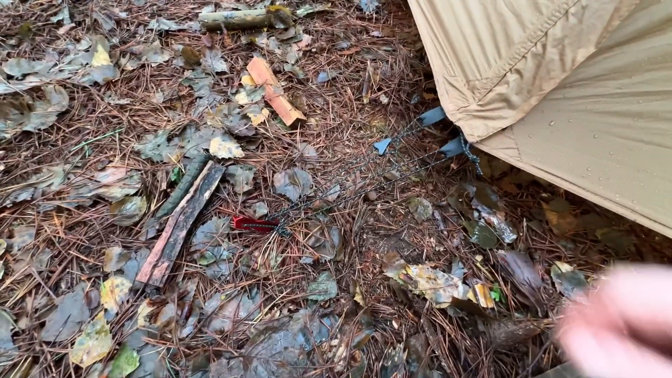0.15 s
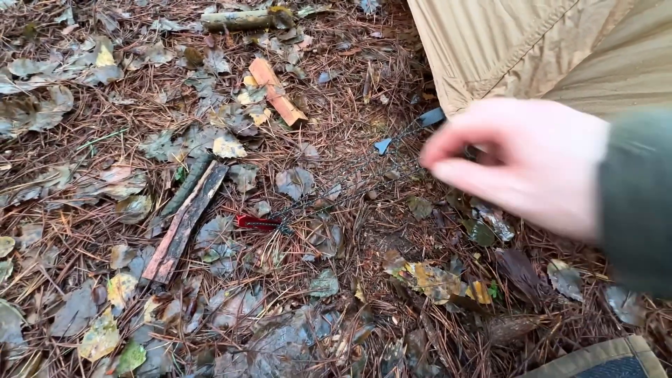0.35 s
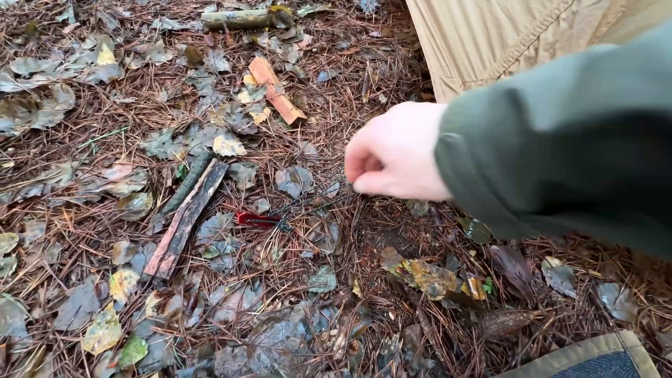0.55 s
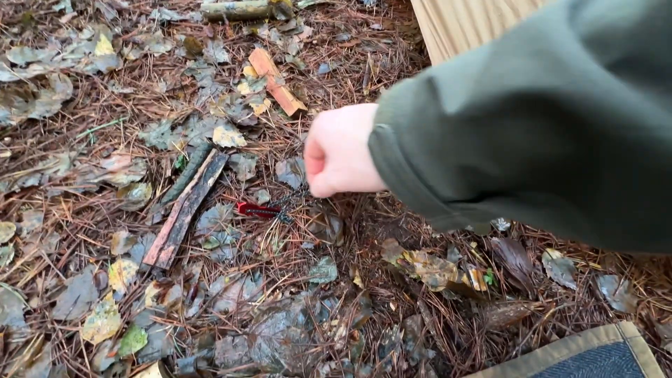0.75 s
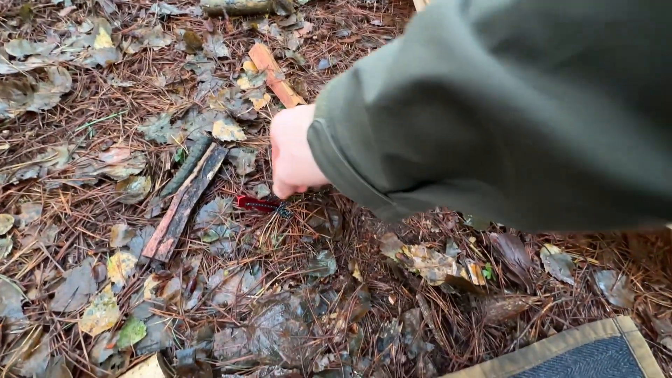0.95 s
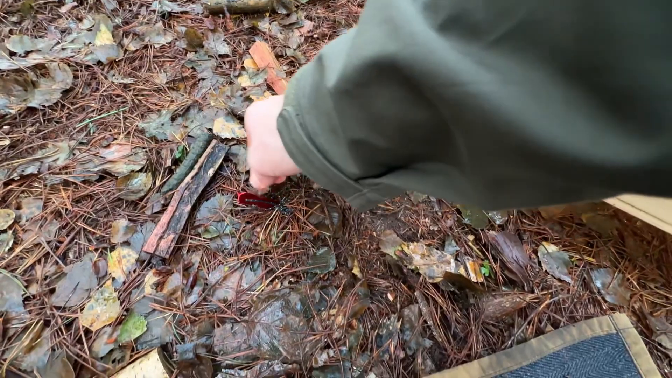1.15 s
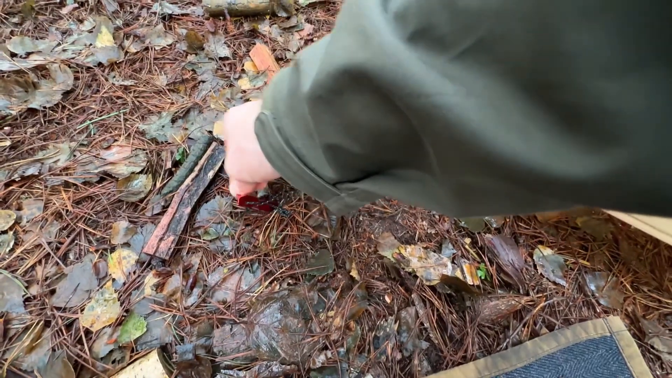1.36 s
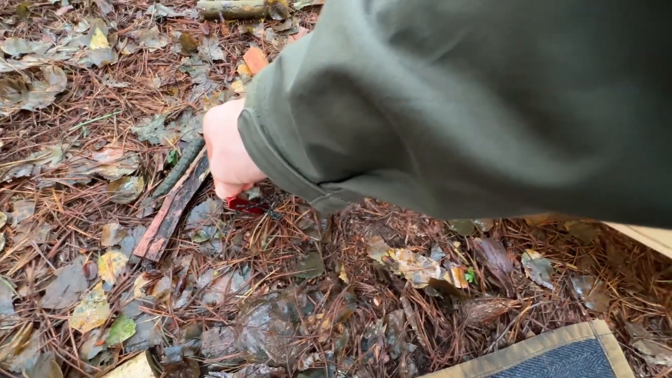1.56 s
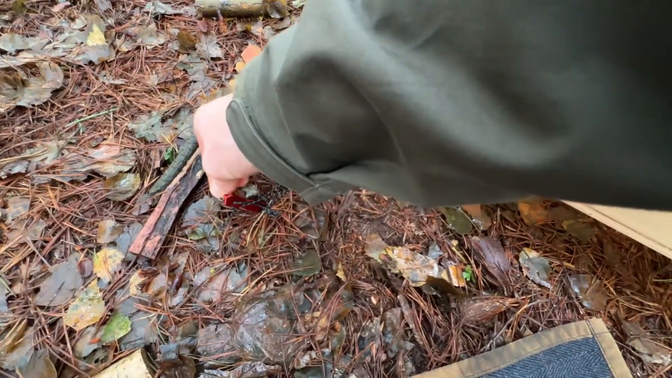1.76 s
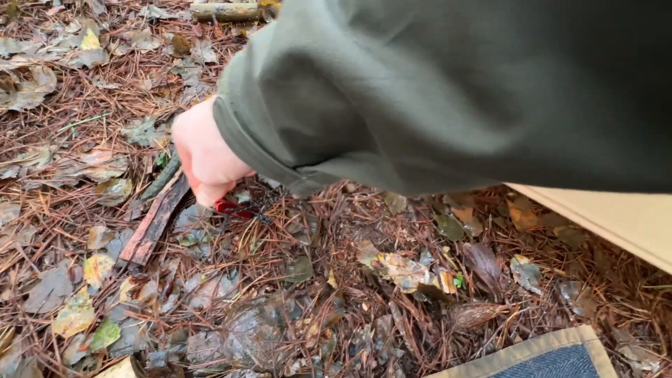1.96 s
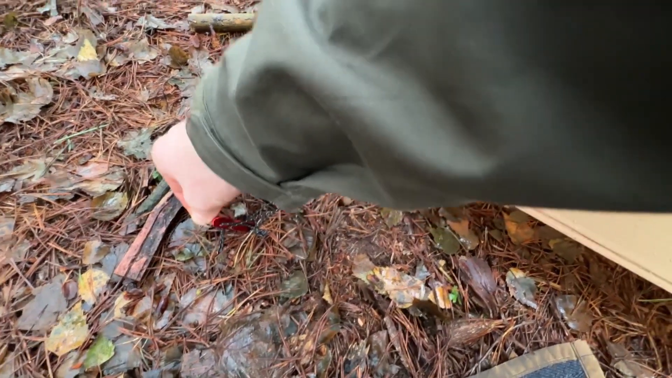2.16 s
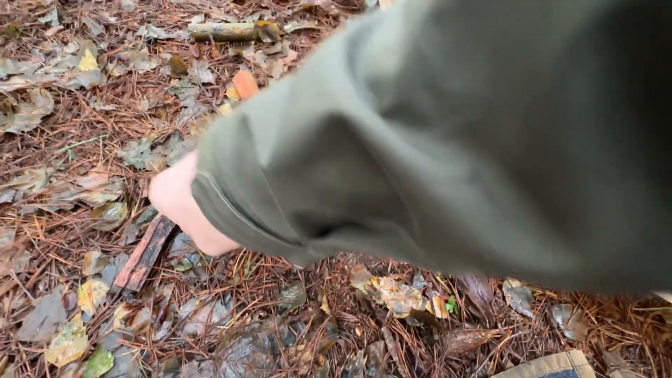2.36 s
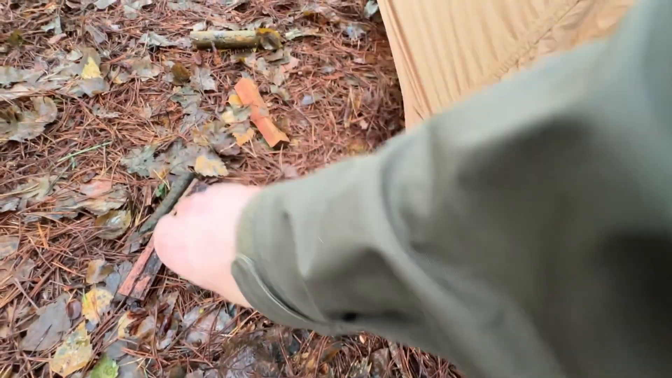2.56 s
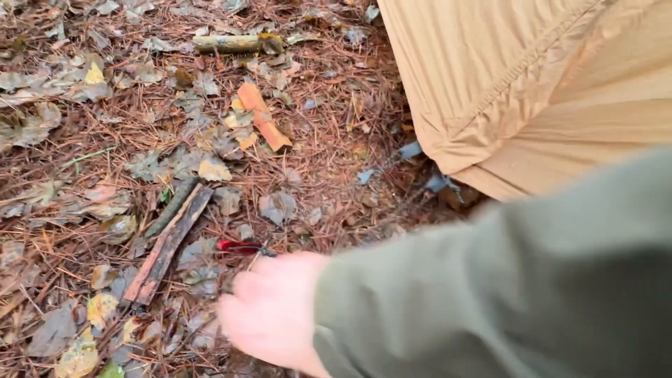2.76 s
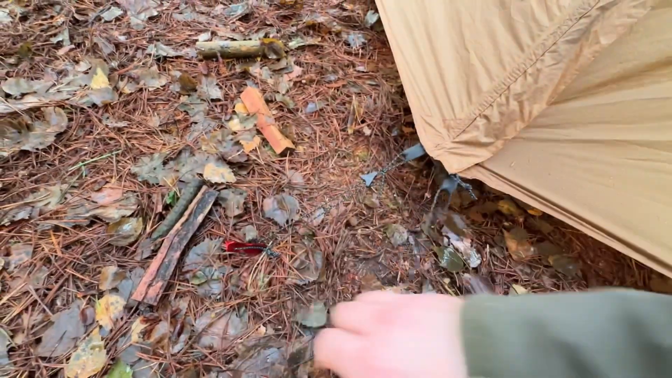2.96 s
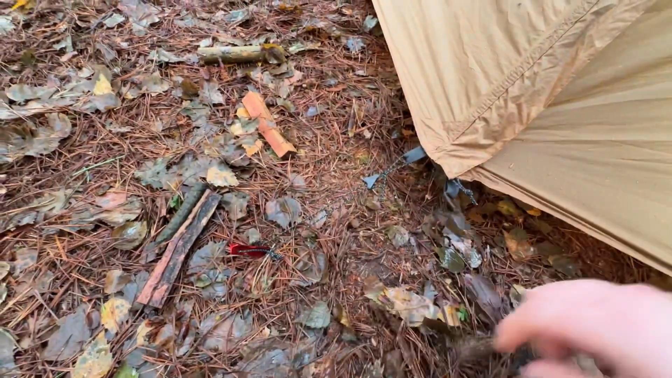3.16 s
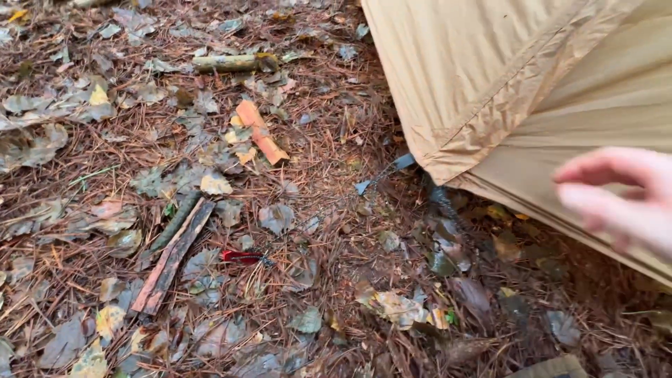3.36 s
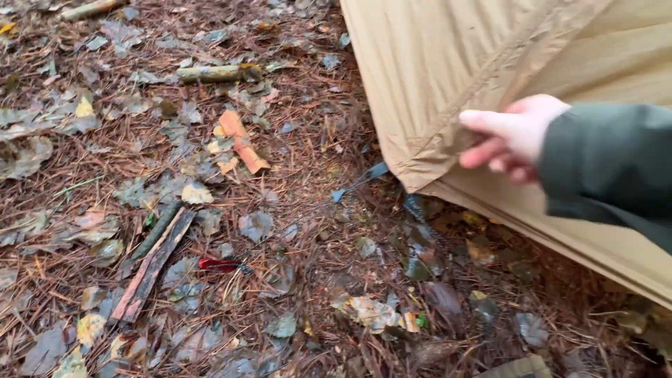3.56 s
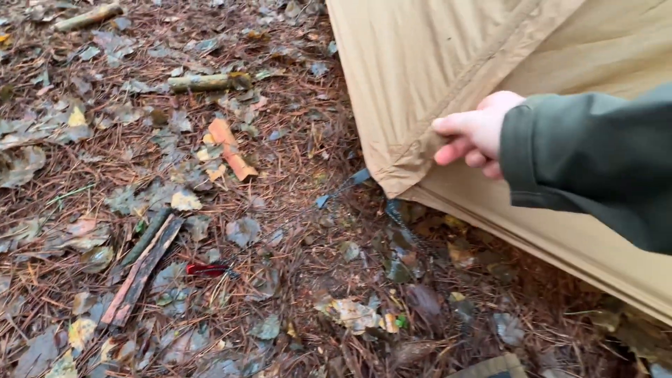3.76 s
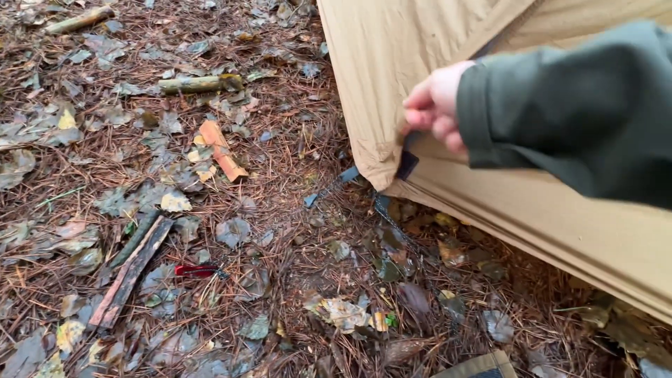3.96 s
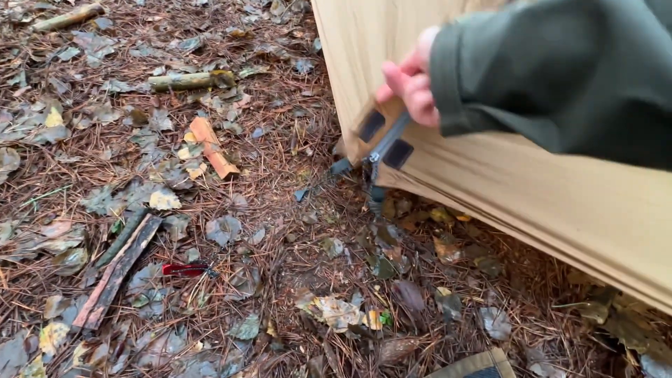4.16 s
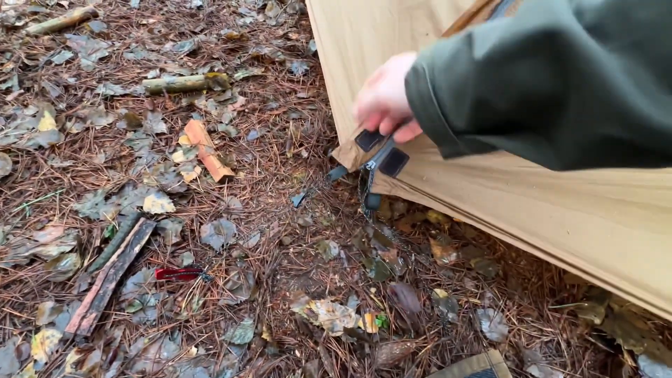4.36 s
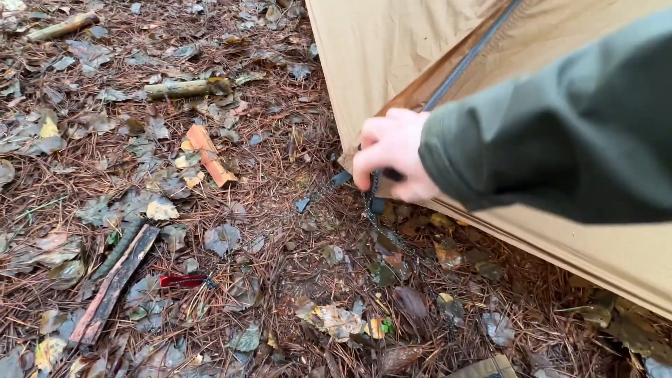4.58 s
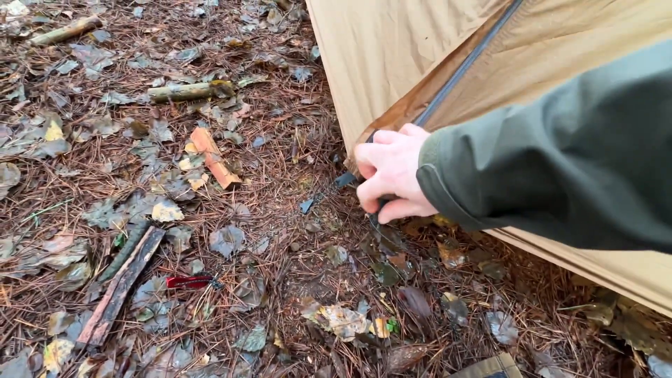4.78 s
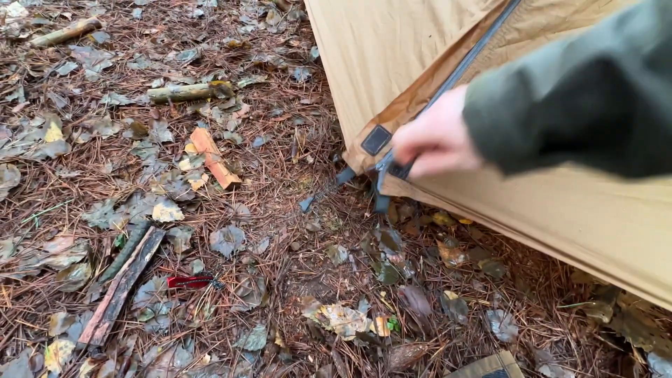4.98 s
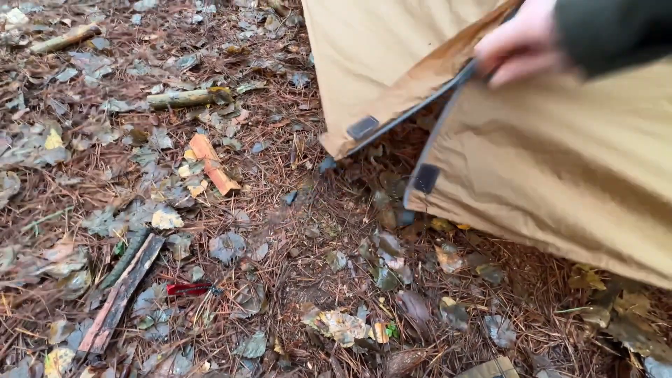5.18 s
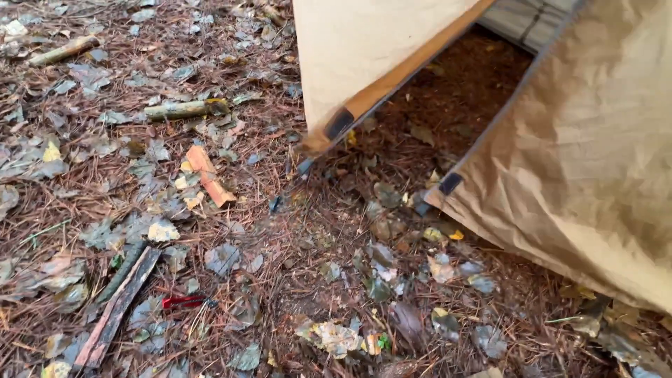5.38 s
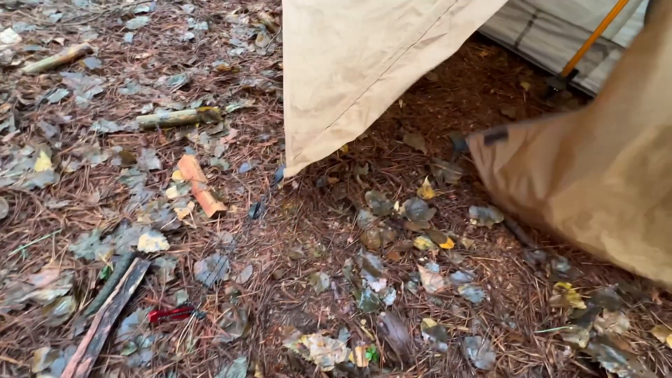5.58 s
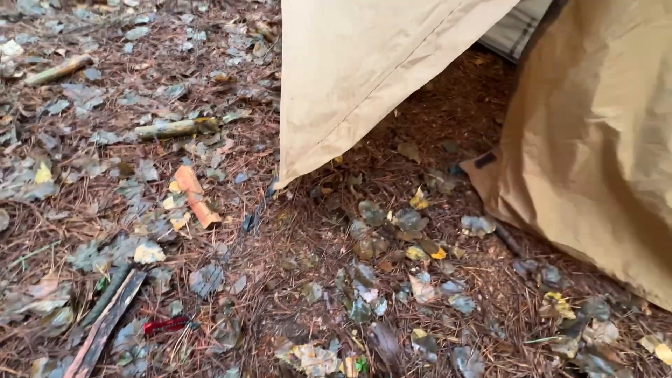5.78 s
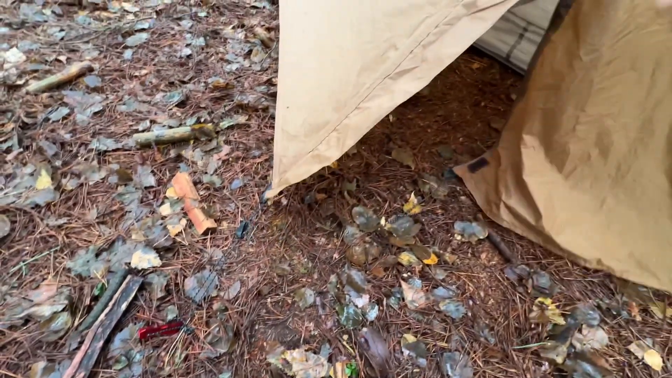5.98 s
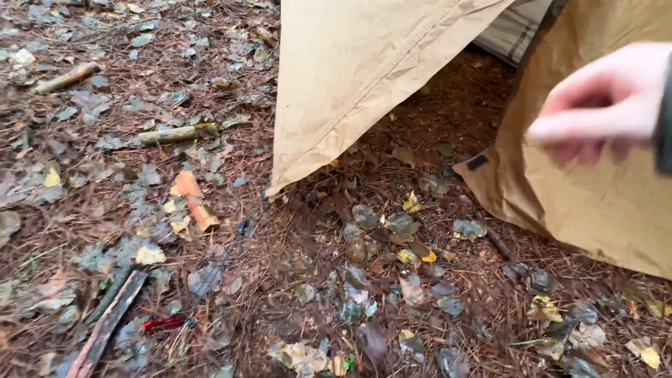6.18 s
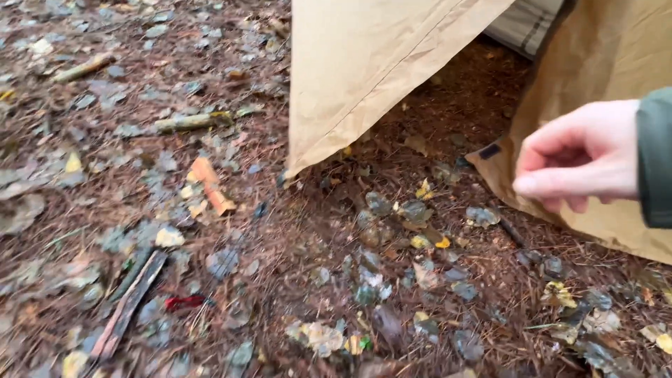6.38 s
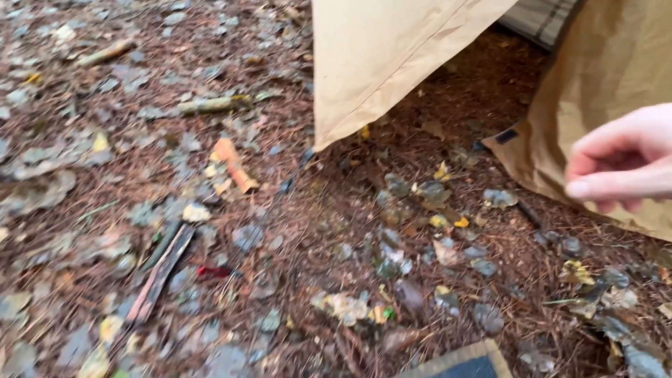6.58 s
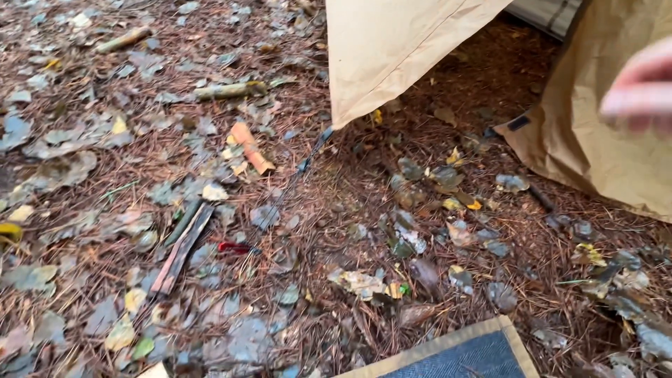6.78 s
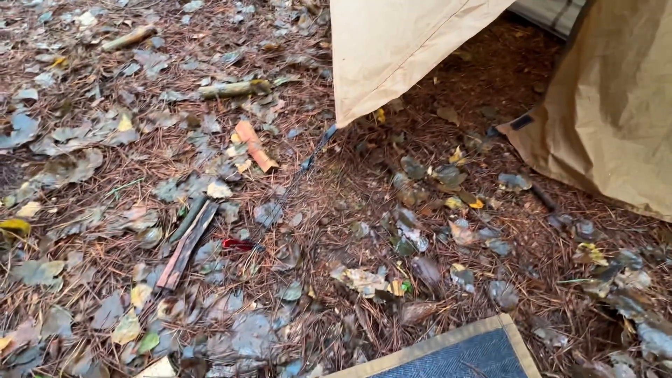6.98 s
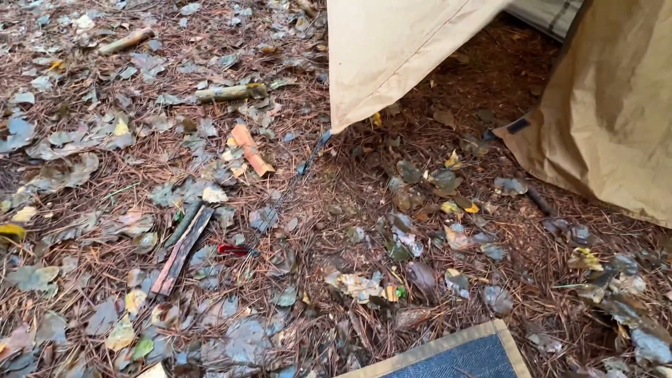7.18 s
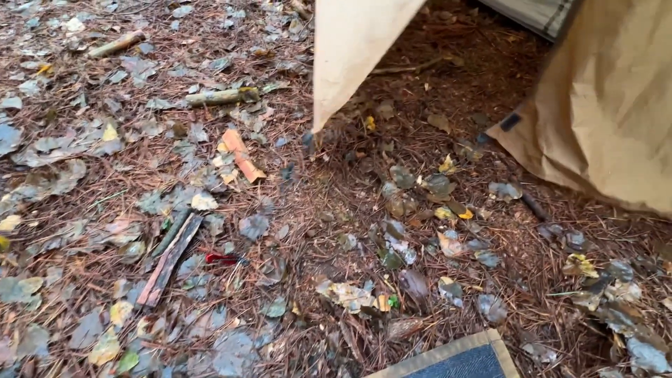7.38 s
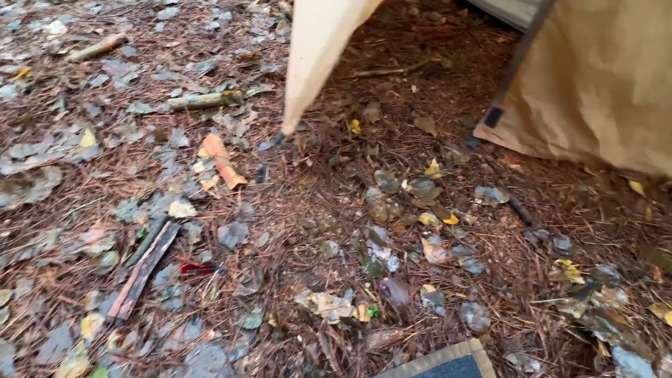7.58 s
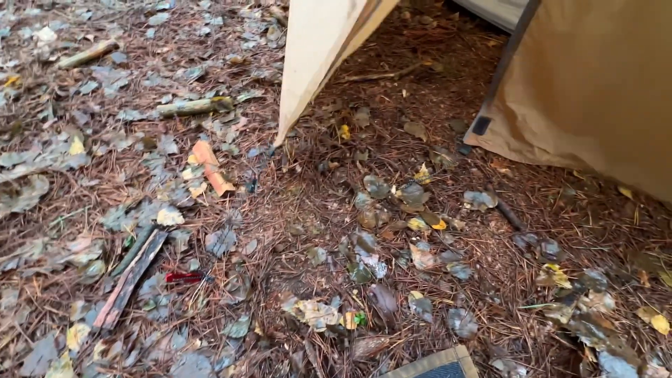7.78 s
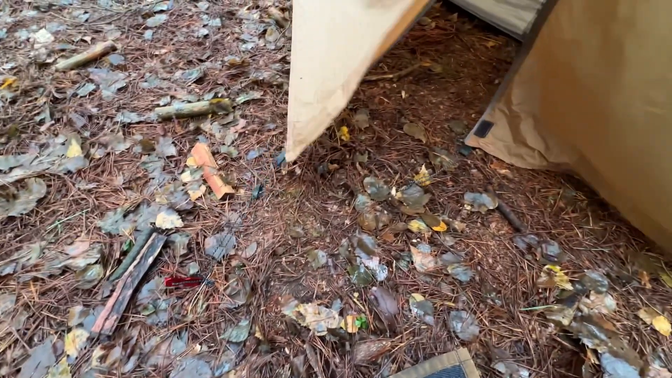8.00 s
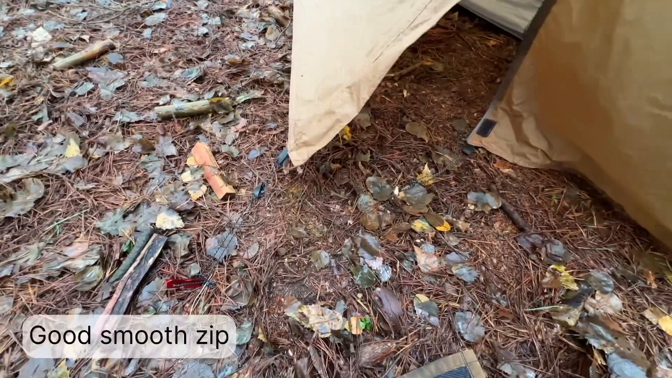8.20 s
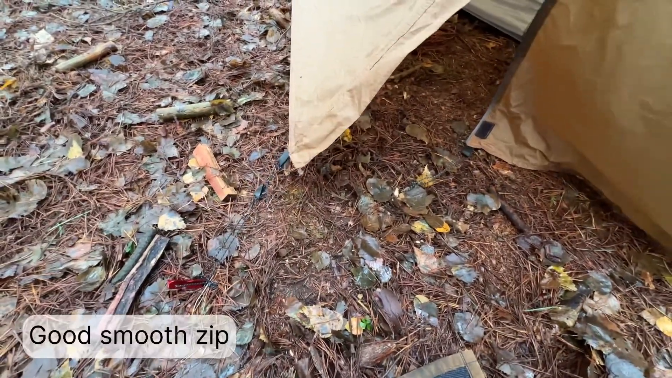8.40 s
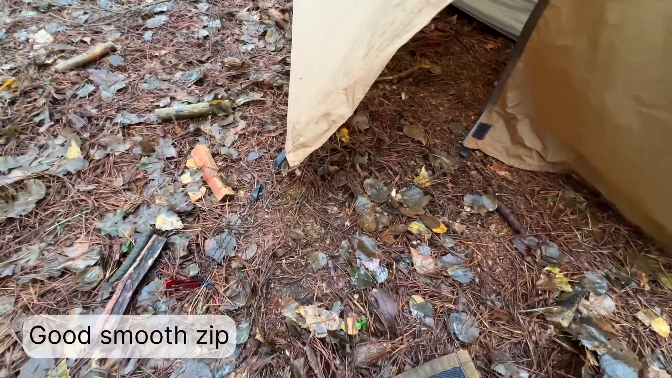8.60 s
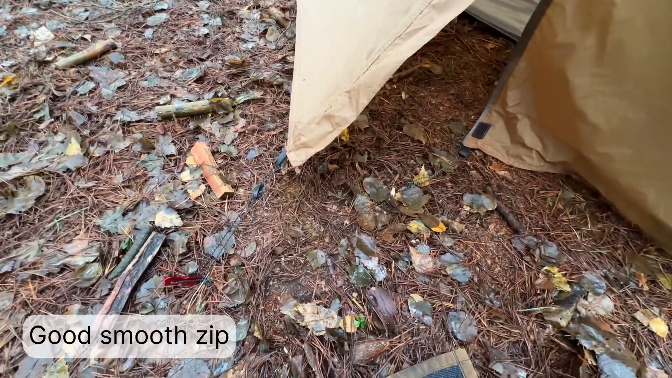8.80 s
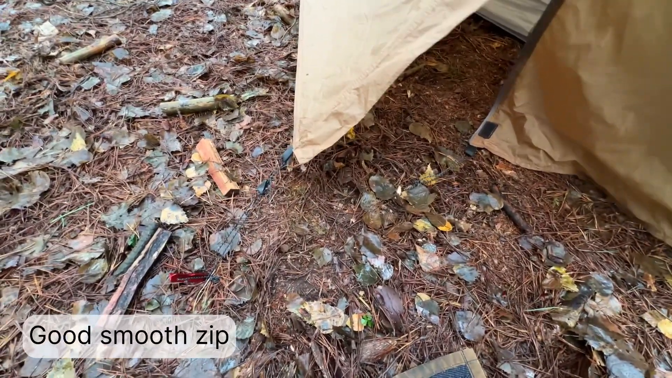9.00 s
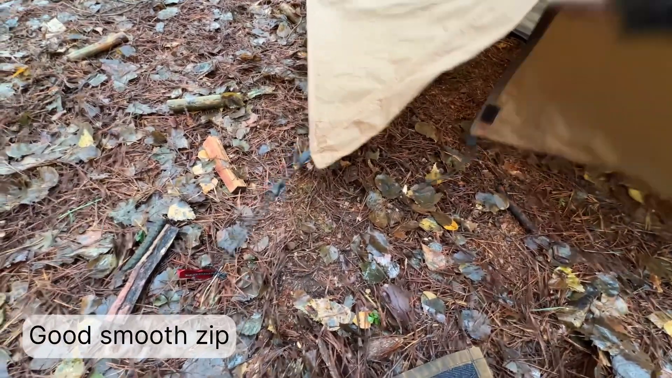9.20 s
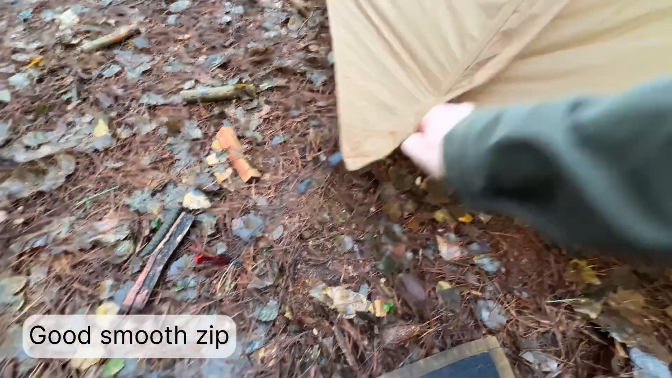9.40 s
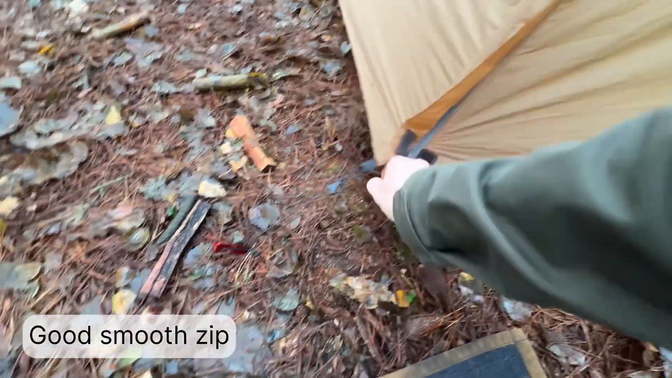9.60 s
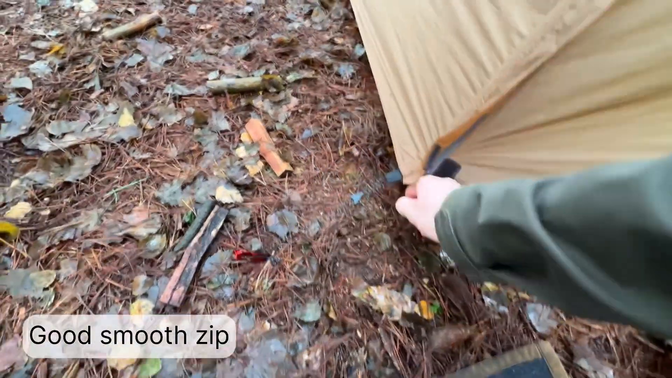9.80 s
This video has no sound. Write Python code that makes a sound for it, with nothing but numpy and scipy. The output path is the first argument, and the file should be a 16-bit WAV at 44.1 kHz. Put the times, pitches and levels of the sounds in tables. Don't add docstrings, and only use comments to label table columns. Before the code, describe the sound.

Faint treetop wind and tiny bird chips lie behind dry close-up tent noises. First come isolated cord snaps, then a burst of fastener crackling, a fast buzzing zip and bright fabric creases. After a quieter rustling pause, the flap tears loose in a ragged burst, small taps follow, and the zipper runs again, swelling quickly then dropping into slow clicks.

```python
import sys
import numpy as np
from scipy import signal
from scipy.fft import rfft, irfft, next_fast_len
from scipy.io import wavfile
from scipy.ndimage import uniform_filter1d, map_coordinates

SR = 44100
rng = np.random.default_rng(int(sys.argv[2]) if len(sys.argv) > 2 else 0)


def store_wav(level_fs):
    pcm = np.round(np.clip(np.atleast_2d(level_fs), -1, 1) * 32767)
    wavfile.write(sys.argv[1], SR, pcm.T.astype(np.int16))


def ratio(d):
    e = np.asarray(d, float) / 20
    return 10 ** e


N = 434385

TAUT_CLOTH, LOOSE_CLOTH = 0.64, 0.34


def unit(x):
    return x / np.sqrt(np.mean(x ** 2) + 1e-20)


def along(points, hz):
    f, v = np.transpose(points)
    return np.interp(np.log(hz + 1), np.log(f + 1), v)


def wobble(rate_hz, size=N):
    knots = rng.standard_normal(int(size * rate_hz / SR) + 4)
    return map_coordinates(knots, [np.arange(size) * rate_hz / SR])


def filtered(x, response):
    m = next_fast_len(x.shape[-1] + 4096)
    spectrum = rfft(x, m) * response(np.fft.rfftfreq(m, 1 / SR))
    return irfft(spectrum, m)[..., :x.shape[-1]]


def rush(spectrum, patchy_db, size=N):
    z = signal.stft(rng.standard_normal(size), nperseg=512)[2]
    patches = uniform_filter1d(rng.standard_normal(z.shape), 6, axis=0)
    patches = uniform_filter1d(patches, 8, axis=1)
    noise = signal.istft(z * ratio(patchy_db * unit(patches)), nperseg=512)[1][:size]
    return unit(filtered(noise, lambda hz: ratio(along(spectrum, hz))))


def add(track, s, sound):
    part = track[round(s * SR):][:len(sound)]
    part += sound[:len(part)]


def zipper(start_s, stroke, panel):
    # start_s (centre), speed_change (share), click_change_db, half_width_s
    catches = [(5.018, .13, 0, .012), (5.09, -.01, -6, .02), (5.238, -.035, -5, .012), (5.258, 0, 3, .008),
               (5.274, -.06, -5, .007), (5.312, -.05, -5, .005), (5.326, 0, 2, .008),
               (5.342, -.045, -8, .006), (5.365, .02, 2, .012), (5.394, 0, -14, .014), (9.163, 0, -6, .006),
               (9.196, 0, -6, .006), (9.243, 0, -9, .012), (9.375, 0, -5, .02), (9.42, 0, 1.5, .015),
               (9.46, 0, -9, .018), (9.49, 0, -4, .03), (9.53, 0, -5, .015)]
    # pitch_hz, level_db (per Hz)
    rasp = [(88, -26), (150, -3.5), (439, -9.5), (624, -1.5), (1390, -5.5), (1530, -3), (1980, -4),
            (3290, -5.5), (3550, -6), (8070, -10), (16000, -24)]
    track, n = np.zeros(N), SR * 4 // 5
    first = round(start_s * SR)
    t = np.arange(first, first + n) / SR
    times, *columns = np.transpose(stroke)
    rate_hz, click_db, blunt_db, rasp_db = [np.interp(t, times, c) for c in columns]
    for s, change, catch_db, width_s in catches:
        near = np.exp(-((t - s) / width_s) ** 2)
        rate_hz = rate_hz * (1 + change * near)
        click_db = click_db + catch_db * near
    starting = np.clip((t - times[0]) / 0.0045, 0, 1)
    stopping = np.clip((times[-1] - t) / 0.0053, 0, 1)
    uneven = .01 * wobble(110, n) + .004 * wobble(35, n)
    turn = 2 * np.pi * np.cumsum(rate_hz * (1 + uneven)) / SR
    tone = np.zeros(n)
    for k in range(1, 10):
        level_db = click_db + along(panel, k * rate_hz) - blunt_db * (k - 1)
        flutter_db = .9 * wobble(32, n) + 2.1 * wobble(65, n) + 2.4 * wobble(190, n)
        phase = k * turn + .27 * np.sqrt(k) * wobble(200, n)
        tone += ratio(level_db + flutter_db) * np.sin(phase)
    scrape = rush(rasp, patchy_db=2.0, size=n) * (1 + .45 * np.cos(turn)) * ratio(1.5 * wobble(70, n))
    track[first:first + n] = starting * stopping * (tone + ratio(rasp_db + 2.5) * scrape)
    return track


def zipper_up():
    # start_s, teeth_hz (teeth per second), click_db, bluntness_db (lost per partial), rasp_db
    stroke = [
        (4.998, 760, -33, 4, -39),
        (5.036, 460, -38, 3.5, -37.5),
        (5.12, 515, -43, 2, -37.5),
        (5.195, 620, -33, 2.6, -36),
        (5.212, 745, -35, 4, -37),
        (5.258, 925, -33.5, 1.2, -37),
        (5.305, 945, -34, 1.2, -37),
        (5.324, 1040, -34, .5, -37),
        (5.4, 975, -35.5, .5, -35),
    ]
    # pitch_hz, level_db
    taut_panel = [(450, -5), (950, -3), (1400, -2), (1900, -1), (2500, 3), (3050, 7), (3500, -7),
                  (9000, -20)]
    return zipper(4.9, stroke, taut_panel)


def zipper_down():
    # start_s, teeth_hz (teeth per second), click_db, bluntness_db (lost per partial), rasp_db
    stroke = [
        (8.96, 289.5, -61, 3, -60),
        (9.044, 335.7, -53.5, 2.1, -44),
        (9.124, 589, -38, 2.9, -42),
        (9.169, 672, -40.5, 1.1, -41.5),
        (9.294, 668.6, -38, 6.2, -43.5),
        (9.404, 507, -34, 7.7, -41.5),
        (9.539, 292, -39, 1.74, -44),
        (9.606, 139, -35, 14.4, -51.5),
        (9.69, 88.1, -59, 11, -84.5),
    ]
    # pitch_hz, level_db
    slack_panel = [(120, 2), (450, 1), (900, -5), (1250, 4), (1900, -1), (2600, -5), (3300, 5), (4800, -10)]
    return zipper(8.9, stroke, slack_panel)


def snaps(rows, low):
    track, t = np.zeros(N), np.arange(1024) / SR
    for s, db, treble_db, hz, ms in rows:
        rise = 1 - np.exp(-t / (ms * 6e-5))
        releases = rise * rng.standard_normal(len(t)) * ratio(3.26 * rng.standard_normal(len(t)))
        releases[12] += 14 / ms
        shape = ratio(-12 * (t * 1000 / ms) ** 1.09) + .02 * ratio(-60 * t / .03)

        def body(f):
            resonance = 0.49 * hz / (hz * hz - f * f + .55j * hz * f)
            low_cloth = low * 1500 / (850 ** 2 - f * f + 1500j * f)
            highs_first = np.exp(-2.5j * np.log(1 + f / 300))
            dull = (2.8 * hz / (4.8 * hz + 1j * f)) ** 2 * highs_first
            return 1j * f * (resonance + low_cloth) * dull

        def treble(f):
            return (1j * f / (3800 + 1j * f)) ** 2 * 12000 / (12000 + 1j * f)

        ring = filtered(shape * releases, body)
        spray = filtered(shape ** 1.3 * releases, treble)
        spray *= ratio(treble_db - 7) / abs(spray).max()
        add(track, s - .0004, ratio(db + 2.0) * (ring / abs(ring).max() + spray))
    return track


def tab():
    # start_s, level_db (peak), treble_db (over the peak), pitch_hz, length_ms
    releases = [(3.781, -11, -13, 1480, 1.55), (3.7845, -26.5, -3, 1680, 3.6),
                (3.8835, -25, -11, 2860, 2.6), (3.887, -4.5, -15, 1910, 1.4), (3.8915, -8, -7, 1030, 2.6),
                (3.9165, -27, -12, 960, 1.3), (3.9773, -8.5, -1, 1390, 2.07), (3.9967, -10.5, 6, 1120, 2.5),
                (4.001, -9.5, -2, 1130, 2.65), (4.0225, -18, -7, 2490, 1.6), (4.1042, -7, -15, 1400, 5.5),
                (4.1046, -1.5, -10, 3300, 4.1), (4.1159, -27, -18.5, 3360, 8),
                (4.1519, -15.5, 0, 1560, 2.8), (4.2847, -25, -3.5, 1750, 4.8), (4.4713, -28, -19, 1730, 4),
                (4.624, -28, -4, 3870, 1.6)]
    return snaps(releases, TAUT_CLOTH)


def guy_line():
    # start_s, level_db (peak), treble_db (over the peak), pitch_hz, length_ms
    slips = [
        (1.3528, -21, -8, 2000, 3.2),
        (2.2606, -17, -3, 1110, 3.6),
        (2.625, -22, -3, 800, 8.6),
        (2.63, -15, -17, 1200, 4.3),
        (2.6335, -24, -13, 900, 12),
    ]
    return snaps(slips, TAUT_CLOTH)


def flap():
    # start_s, level_db (peak), treble_db (over the peak), pitch_hz, length_ms
    tears = [(7.2806, -17.5, -42, 2220, 5.3), (7.2836, -16, -33, 2900, 2.2), (7.3023, -28, -19, 3380, 3.4),
             (7.348, -22.5, -11, 2800, 3.9), (7.379, -23.5, -18, 2190, 3.8), (7.4113, -21, -4, 2570, 3.9),
             (7.4514, -19.5, -7.5, 2450, 3.7), (7.463, -11, -3.5, 1900, 5.1),
             (7.4856, -19.5, -13, 1960, 5.7), (7.4889, -22, -12, 3340, 8.8), (7.4939, -19, -13, 1920, 3.5),
             (7.504, -13, -8, 1950, 8.2), (7.5163, -20, -10, 2580, 4.9), (7.523, -22.5, -2.5, 790, 2.6)]
    return snaps(tears, LOOSE_CLOTH)


def slider():
    # start_s, level_db (peak), treble_db (over the peak), pitch_hz, length_ms
    knocks = [(5.0028, -19.5, 0.5, 1400, 11.5), (5.0096, -24, -1, 1540, 6.5), (5.3811, -25, 2, 900, 8.5),
              (5.385, -18.5, -1, 1700, 12), (5.4287, -13, -2, 2000, 5), (5.441, -24, -5, 2260, 6),
              (5.4482, -23, -12, 4780, 8.9), (9.42, -37, -15, 990, 3.5), (9.4638, -27, -5, 1793, 7.3),
              (9.4804, -18, -5, 3680, 4.1), (9.5034, -16, -20, 2063, 1.42), (9.516, -25, -22, 1580, 2),
              (9.5377, -20.5, -18, 935, 2.5)]
    return snaps(knocks, TAUT_CLOTH)


def thumps():
    # start_s, level_db (peak), pitch_hz (at the kick), halving_ms (until the pitch has halved), t60_s (fade by 60 dB)
    kicks = [(1.356, -28.5, 110, 28, 0.11), (1.354, -13, 520, 5.1, 0.046), (2.262, -12.5, 824, 1.55, 0.042),
             (2.631, -29, 1120, 19, 0.022), (2.632, -20, 100, 37, .07), (3.782, -25, 497, 2.7, 0.018),
             (3.8876, -19, 690, 1.8, 0.021), (3.892, -25, 700, 1.6, 0.042), (3.979, -31.5, 690, 3.1, 0.07),
             (4.003, -28, 600, 2.3, 0.033), (4.108, -20, 335, 5.6, 0.065), (4.153, -29, 448, 2.9, 0.075),
             (4.708, -34, 447, 13, 0.045), (5.004, -31, 606, 16, 0.057), (5.382, -30.5, 344, 8.4, 0.088),
             (5.431, -27, 700, 4, .06), (7.282, -43, 610, 3.8, 0.038), (7.465, -30, 700, 3.8, .04),
             (7.489, -13, 744, 25, 0.024), (7.507, -24, 706, 21, .025), (7.521, -30, 300, 11, .025),
             (9.84, -38, 245, 4.4, 0.056)]
    track, t = np.zeros(N), np.arange(SR // 6) / SR

    def loose_cloth(f):
        return (1j * f * 300 / (250 ** 2 - f * f + 450j * f)) ** 2

    for s, db, hz, ms, t60_s in kicks:
        sweep = np.sin(2 * np.pi * hz * ms / 1000 * np.log(1 + t * 1000 / ms))
        flutter = unit(filtered(rng.standard_normal(len(t)), loose_cloth))
        shape = ratio(db + 3 - 60 * t / t60_s) * (1 - np.exp(-t / .0015))
        add(track, s, shape * (sweep + .32 * flutter))
    return track


def faint_ticks():
    # start_s, level_db (peak), pitch_hz
    needles = [(0.714, -41, 1890), (1.516, -44.5, 2820), (1.163, -47, 5500), (1.1989, -38.5, 1210),
               (1.4713, -38.5, 2240), (1.701, -47, 4400), (2.294, -37, 800), (2.6152, -40, 700),
               (2.6437, -35, 860), (2.851, -41, 2020), (4.705, -31, 1200), (4.8806, -35.5, 1540),
               (5.5395, -36, 2260), (5.6656, -36, 2000), (9.243, -34, 983), (9.6016, -44, 4200),
               (9.8264, -41, 1730), (9.8406, -34, 820)]
    # start_s, level_db (peak), pitch_hz
    hooks = [(3.7511, -38.5, 1390), (3.8198, -34, 1660), (3.8528, -38, 3500), (3.9651, -31, 1980),
             (4.053, -37.5, 3120), (4.2925, -31.5, 2480), (4.3274, -40, 2450), (4.4185, -42, 1580),
             (4.5866, -43.5, 860), (4.5999, -33.5, 3420), (7.3273, -37, 2200), (7.335, -40, 2000),
             (7.395, -39, 2500), (7.433, -37, 2890), (7.4737, -36, 3210), (7.5402, -37, 820),
             (7.557, -44, 1850), (7.5937, -39, 1890), (7.634, -34.5, 2080)]
    rows = [(s, db, -7, hz, 3.15) for s, db, hz in needles]
    rows += [(s, db, -9, hz, 1.9) for s, db, hz in hooks]
    return snaps(rows, LOOSE_CLOTH)


def creases():
    # start_s, level_db (peak)
    pops = [(3.807, -39), (3.9254, -33), (5.4815, -30), (5.4934, -42), (5.5223, -45), (5.566, -39),
            (5.6136, -38), (5.682, -38), (5.6894, -43), (5.8084, -52), (5.8594, -50), (5.8893, -41),
            (5.9978, -41), (7.012, -52), (7.0793, -49), (7.1614, -47), (7.1694, -49), (7.2155, -47),
            (7.8705, -48), (8.093, -43), (8.114, -41), (8.2556, -40), (8.4044, -52), (8.4124, -51),
            (8.4194, -51), (8.4684, -53), (8.4916, -47), (8.5829, -43), (8.5959, -39), (8.7854, -52)]
    treble_db, pitch_hz, length_ms = -11, 5500, 3.03
    rows = [(s, db - 4, treble_db, pitch_hz, length_ms) for s, db in pops]
    return snaps(rows, LOOSE_CLOTH / 2)


def taps():
    # start_s, level_db (peak), pitch_hz
    contacts = [(7.539, -37, 2200), (7.556, -34, 1900), (7.558, -35, 790), (7.569, -33, 330),
                (7.581, -44, 1800), (7.594, -39, 2000), (7.595, -43, 2900), (7.605, -36, 300),
                (7.606, -44, 3200), (7.2825, -19, 3500), (2.6295, -13, 1170), (2.637, -26, 750),
                (2.616, -32, 400), (5.008, -22, 1400), (5.014, -24, 1420), (4.105, -12, 3250),
                (3.887, -16, 1100), (9.525, -21, 1800), (9.508, -30, 900)]
    t60_s = .016
    track, t = np.zeros(N), np.arange(SR // 20) / SR
    for s, db, hz in contacts:
        shape = ratio(db + 5 - 60 * t / t60_s) * (1 - np.exp(-t / 0.0013))
        add(track, s, shape * np.sin(2 * np.pi * hz * t))
    return track


def pull():
    # start_s, level_db (peak)
    contacts = [
        (8.6217, -34),
        (8.633, -32),
        (8.6478, -42),
        (8.67, -46),
        (8.695, -39),
        (8.909, -41),
        (8.98, -40),
    ]
    notes_hz = [1400, 2780, 3300]
    t60_s = 0.044
    track, t = np.zeros(N), np.arange(SR // 10) / SR
    for s, db in contacts:
        ring = np.zeros(len(t))
        for hz in notes_hz:
            strength = ratio(rng.normal(0, 3) - 11)
            ring += strength * np.sin(2 * np.pi * hz * rng.normal(1, 0.0092) * t)
        grit = 1 + 0.92 * rng.standard_normal(len(t))
        shape = ratio(db - 60 * t / t60_s) * (1 - np.exp(-t / 0.00091))
        add(track, s, shape * grit * ring)
    return track


def movement(swells):
    swell_db, still_db = 15.5, -76
    t, power = np.arange(N) / SR, ratio(2 * still_db) / 2
    for s, db, rise_s, fall_s in swells:
        away = np.where(t < s, (s - t) / rise_s, (t - s) / fall_s)
        power = power + ratio(2 * (db - swell_db * away))
    return power


def rustle():
    # start_s (of the peak), level_db, rise_s, fall_s
    sleeve_swells = [(0.78, -58, 1.3, 0.96), (1.22, -63.5, 0.2, 0.091), (1.508, -69, .2, 0.15),
                     (1.71, -82, 0.034, 0.098), (2.22, -64, 0.32, 0.11), (2.44, -53, 0.044, 0.084),
                     (2.55, -53, 0.046, 0.053), (2.84, -51, 0.18, 0.062), (3.1, -58.5, 1.8, 0.85),
                     (3.4, -59.5, 0.22, 0.17), (3.517, -56.5, .2, 0.18), (4.55, -51.5, 0.17, 0.089),
                     (4.746, -53, 0.16, 0.056), (6.01, -58, 0.24, 0.14), (6.8, -63, 0.13, 0.23),
                     (7.17, -64, 0.34, .2), (7.955, -52.5, 0.11, 0.19), (8.262, -55.5, 0.032, 0.12),
                     (8.649, -40.5, 0.028, 0.0063), (8.682, -50, .03, .009), (8.7, -51, .008, 0.027),
                     (5.483, -48, 0.013, 0.02), (8.49, -62.5, 0.1, 0.07), (8.81, -58.5, 0.036, 0.074),
                     (9.73, -66, 0.063, .3), (9.85, -61, 0.053, .1)]
    # start_s (of the peak), level_db, rise_s, fall_s
    tent_swells = [(1.362, -56.5, 0.024, 0.082), (2.278, -54.5, 0.024, 0.12), (2.636, -46.5, .0088, 0.038),
                   (3.91, -54, 0.16, .2), (4.0, -50.5, .1, 0.078), (4.12, -53, 0.089, .1),
                   (4.175, -42, 0.029, 0.036), (4.287, -42.5, 0.067, 0.13), (4.873, -49, 0.031, 0.016),
                   (4.974, -51, 0.068, 0.072), (5.41, -42, 0.099, 0.067), (5.62, -52, .3, 0.17),
                   (7.291, -53, .025, 0.065), (7.38, -55, 0.2, 0.45), (7.492, -24, 0.016, 0.027),
                   (7.58, -55.5, 0.11, 0.27), (8.6, -51.5, 0.02, .1), (8.64, -50.5, 0.055, 0.11),
                   (9.04, -55.5, 0.17, 0.52), (9.52, -49, 0.08, 0.047), (5.455, -43, .02, 0.036),
                   (9.61, -56, 0.051, .04)]
    # pitch_hz, level_db (per Hz)
    cloth = [(600, -37), (1200, -2.5), (1600, -7.5), (3000, -6), (6000, -13), (10000, -14), (11000, -24.5),
             (15500, -23), (17000, -28)]
    # pitch_hz, level_db (change)
    sleeve_colour = [(1000, -3), (3000, -0.5), (6000, 1.5), (12000, 2)]
    sleeve, tent = movement(sleeve_swells), movement(tent_swells)
    level = np.sqrt(sleeve + tent)
    sleeve_share = sleeve / (sleeve + tent)

    happens = rng.random(N) < 120 / SR
    strength = ratio(3 * np.minimum(rng.exponential(size=N), 3))
    ticks = happens * strength * rng.standard_normal(N)
    ticks = filtered(ticks, lambda f: ratio(along(cloth, f)) * np.exp(-1j * 1500 / (f + 500)))
    hiss = 1.003 * rush(cloth, patchy_db=1.9) * ratio(2.0 * wobble(45)) + 0.17 * unit(ticks)
    thin = filtered(hiss, lambda f: ratio(along(sleeve_colour, f)))
    hiss = (1 - sleeve_share) * hiss + sleeve_share * thin

    sheen = filtered(hiss, lambda f: f > 10600)
    sheen_gain = np.minimum(level / ratio(-58.5), 1) ** 0.54
    return level * (hiss + sheen * (sheen_gain - 1))


def birds():
    # start_s, level_db, pitch_hz, length_s
    chips = [
        (0.11, -56.5, 8800, 0.032),
        (0.772, -53, 7810, 0.03),
        (6.4418, -64, 7300, 0.03),
        (6.688, -61.5, 7200, 0.03),
        (6.8658, -59, 7960, 0.03),
        (6.8944, -60, 7120, 0.034),
        (8.48, -62.5, 7400, 0.03),
    ]
    track, t = np.zeros(N), np.arange(SR // 10) / SR
    for s, db, hz, length_s in chips:
        flutter = 1 + .5 * np.sin(2 * np.pi * 70 * t)
        shape = ratio(db - 2 - 12 * t / length_s) * (1 - np.exp(-t / .004))
        add(track, s, shape * flutter * np.sin(2 * np.pi * hz * t * (1 - .15 * t)))
    return track


def forest():
    # pitch_hz, level_db (per Hz)
    woods = [(15, -59), (38, -4.5), (86, 0.5), (188, -4.5), (221, -5), (378, -10), (552, -9.5), (614, -9),
             (970, -10.5), (1800, -17), (2770, -26.5), (7300, -43.5), (15500, -72.5)]
    return ratio(-50 + 0.78 * wobble(1.9)) * rush(woods, patchy_db=1.4)


def scene():
    zips = zipper_up() + zipper_down()
    releases = tab() + guy_line() + flap() + slider() + thumps()
    small = faint_ticks() + creases() + taps() + pull()
    return (zips + releases + small + rustle() + birds() + forest())[None]


def low_pass(x):
    return signal.sosfilt(signal.butter(12, 16970, fs=SR, output="sos"), x)


def record(dry):
    top_hz, spark = 15850, 0.1
    held = .86 * np.tanh(dry / .86)

    def main_band(f):
        bass_cut = (f * f / (f * f - 52 ** 2 - 70j * f)) ** 2
        return bass_cut * np.clip((top_hz - f) / 250, 0, 1)

    def top_band(f):
        return np.clip((f - top_hz) / 250 + 1, 0, 1) * (f < top_hz + 900) * ratio(-14.5)

    power = np.abs(uniform_filter1d(held ** 2, size=256, axis=1))
    loud = np.minimum(power / spark ** 2, 1)
    mix = filtered(held, main_band) + loud * filtered(held, top_band)
    return low_pass(mix)


dry = scene()
out = record(dry)
store_wav(out)
```